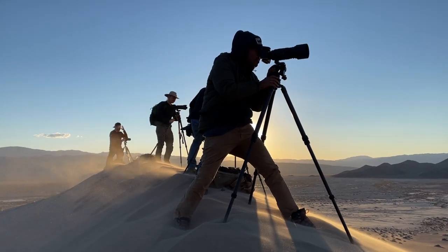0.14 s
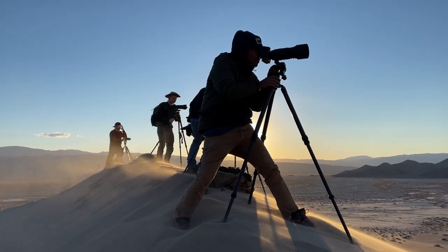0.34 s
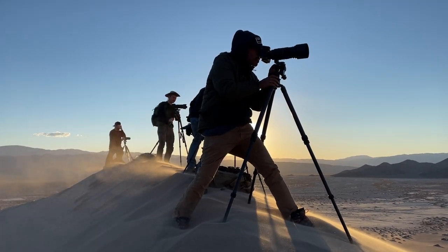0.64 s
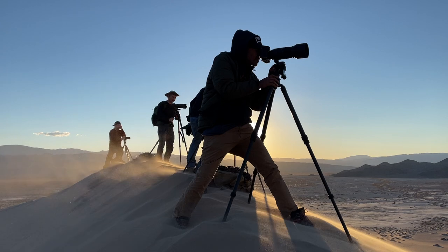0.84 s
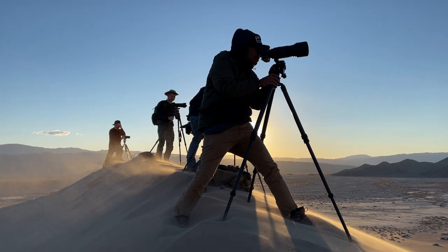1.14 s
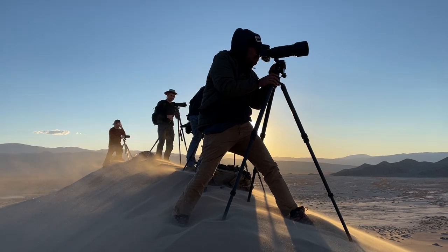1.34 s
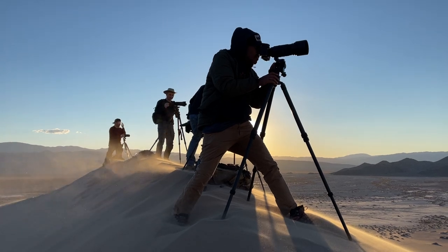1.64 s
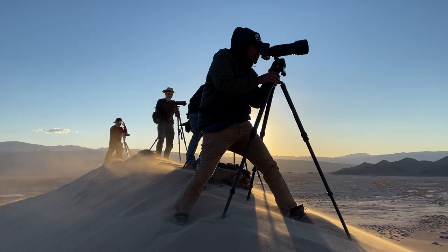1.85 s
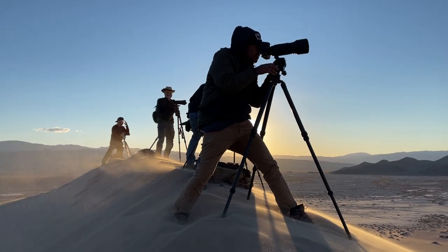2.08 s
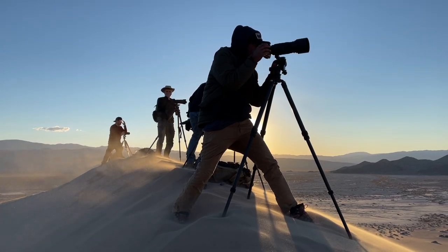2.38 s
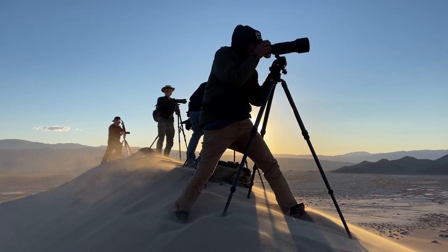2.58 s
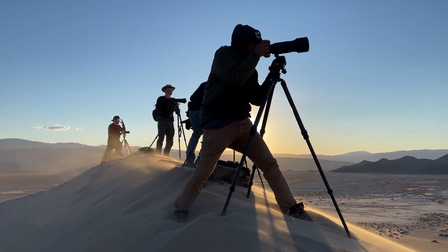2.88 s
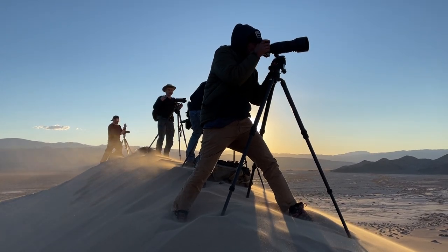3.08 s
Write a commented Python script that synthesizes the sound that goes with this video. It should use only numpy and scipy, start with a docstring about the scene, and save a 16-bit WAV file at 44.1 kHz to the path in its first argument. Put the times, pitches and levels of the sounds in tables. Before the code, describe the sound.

Strong wind buffets an exposed handheld stereo microphone on an open dune for about 3.2 seconds. Deep rumble and lumpy, fluttering roar run throughout, swelling irregularly. Short thuds of falling pitch slap the ports, clustering strongly around 2.1-2.5 s. Sharp, dry, crackly ticks are dense and loud until about 1.8 s, then mostly softer. The roar dips near 3.1 s; faint high hiss lies beneath.

```python
"""A deep rumble under a lumpy roar: strong gusty wind on an open dune, over a handheld stereo microphone's ports.
Rumble, throb, roar and fizz are coloured noise whose levels follow the gusts and the lumps of small eddies.
Larger eddies slap a port with a short thud of falling pitch, a sine mixed with a puff of roar.
Brief snaps of turbulence at the ports tick on top as ragged noise bursts.
Faint high-treble microphone hiss lies beneath it all."""
import sys
import numpy as np
from scipy import signal
from scipy.fft import rfft, irfft, next_fast_len
from scipy.io import wavfile
from scipy.ndimage import map_coordinates

SR = 44100
rng = np.random.default_rng(int(sys.argv[2]) if len(sys.argv) > 2 else 0)


def put_to_file(sound):
    """Save the sound as 16-bit audio at rate SR, in the file named by the first command-line argument."""
    columns = np.atleast_2d(sound).T  # one column per channel
    safe = np.clip(columns, -1, 1)
    whole_steps = np.round(safe * 32767)
    wavfile.write(sys.argv[1], SR, whole_steps.astype(np.int16))


N = 142002
HALVES = np.array([[.5], [-.5]])  # splits a left-over-right difference between the ports


def amp(db):
    """dB to gain."""
    return 10 ** (np.asarray(db) / 20)


def unit(x):
    """Scaled to rms 1."""
    return x / np.sqrt(np.mean(x ** 2) + 1e-20)


def along(points, hz):
    """Interpolates (frequency_hz, value) points on a log-frequency axis."""
    point_hz, values = np.transpose(points)
    return np.interp(np.log(hz + 1), np.log(point_hz + 1), values)


def curves(rows):
    """One value per sample for each column after the time."""
    time_s, *columns = np.transpose(rows)
    return [np.interp(np.arange(N) / SR, time_s, column) for column in columns]


def wobble(knots_per_s):
    """Smooth random curve with its extremes rounded off."""
    knots = rng.standard_normal(4000)
    curve = map_coordinates(knots, [np.arange(N) * knots_per_s / SR])
    return 2.69 * np.tanh(curve / 2.66)


def port_wobble(scale_db, knots_per_s):
    """Level wobble in dB: one part shared by the ports, a larger part separate in each."""
    separate = np.array([wobble(knots_per_s), wobble(knots_per_s)])
    return scale_db * (wobble(knots_per_s) + 2.01 * separate)


def filtered(x, response):
    """x times a complex response of frequency in Hz."""
    size = next_fast_len(N + SR // 2)
    return irfft(rfft(x, size) * response(np.fft.rfftfreq(size, 1 / SR)), size)[..., :N]


def add(out, start_s, level_db, pan_db, sound):
    """Adds a sound at its start, with pan_db of left over right split between the ports."""
    i = max(round(start_s * SR), 0)
    n = min(sound.shape[-1], N - i)
    out[:, i:i + n] += (amp(level_db + HALVES * pan_db) * sound)[:, :n]


# hiss colour in the sum and difference of the ports: frequency_hz, relative_db
HISS_SUM = [(4000, -36), (6000, -7), (8000, -3), (9500, 0.5), (10200, -32), (10700, 1), (11300, 2.5),
            (12000, -1), (14000, -11.5)]
HISS_DIFFERENCE = [(4000, -26), (6000, -16), (8000, -5), (9000, -5), (9800, -1), (10500, 11), (11200, -1),
                   (11800, -28), (12600, -32), (14000, -50)]
# phase of the difference against the sum: frequency_hz, phase_rad
HISS_PHASE = [(9000, 1.5), (10500, 1.6), (11500, 2.5), (12200, 3)]
HISS_SUM_DB = -68  # rms of the sum part, before the treble roll-off


def hiss():
    """Microphone hiss: one noise reaches sum and difference of the ports with its own colour and phase."""
    def response(hz):
        to_sum = amp(along(HISS_SUM, hz)) + 0j
        to_difference = amp(along(HISS_DIFFERENCE, hz)) * np.exp(1j * along(HISS_PHASE, hz))
        return np.array([to_sum, to_difference])

    mid, side = filtered(rng.standard_normal(N), response)
    return amp(HISS_SUM_DB) * np.array([mid + side, mid - side]) / np.std(mid)


FLURRY_DB, FLURRY_WIDTH_S, FLURRY_LAG_S = 3, 0.0037, 0.0044  # lift is scaled again in each layer


def flurries():
    """The air roughens around each loud tick: a smooth, saturating lift in dB."""
    marks = np.bincount([round((start_s + FLURRY_LAG_S) * SR) for start_s, *_ in TICKS], minlength=N)[:N]
    t = np.arange(-SR // 30, SR // 30 + 1) / SR
    bell = np.exp(-.5 * (t / FLURRY_WIDTH_S) ** 2)
    return FLURRY_DB * np.tanh(signal.fftconvolve(marks, bell, "same"))


# loudest ticks, centred 1 ms after start_s:
# start_s, peak_db, left_over_right_db, slope_db_per_octave, decay_ms (floor 0.1)
TICKS = [(0.0915, -11.5, -4, -27, 0.52), (0.1132, -14.5, 17, -21, 0.72), (0.1294, -15, 1, -12.5, 0.57),
         (0.2288, -18.5, 20, -21, 0.95), (0.2483, -16, -2, -18, 1.2), (0.278, -21, -10, -22, 2.2),
         (0.3105, -15.5, -5, -19.5, 1.8), (0.4225, -20, -1, -21, 1), (0.4664, -26, 15, -30, 0.58),
         (0.4849, -10, 4, -15.5, 0.3), (0.5036, -19.5, 21, -16, 0.66), (0.528, -16, 10, -20, 0.78),
         (0.585, -12.5, 7, -22, 0.68), (0.604, -17, 15, -14, 1.3), (0.6447, -16, 6, -12.5, 1.02),
         (0.6663, -25, 24, -13.5, 1.2), (0.684, -17, -3, -17, 0.62), (0.7005, -16, 5, -14.5, 0.78),
         (0.7498, -10, 6, -16.5, 0.66), (0.7806, -30, -13, -14, 0.8), (0.8271, -10.5, 2.5, -28, 0.75),
         (0.8873, -9.5, -2, -14, 2.5), (0.954, -19, 5, -14, 1.3), (0.969, -29, 5, -16, 0.36),
         (1.054, -20, 3, -10.5, 0.51), (1.16, -12.5, 11.5, -26, 1.1), (1.1786, -19, 12.5, -12.5, 0.63),
         (1.1934, -15.5, -3, -12.5, 0.76), (1.2133, -18, 10, -16, 1), (1.235, -17, 19, -24, 1.1),
         (1.276, -14, 1, -16.5, 3.4), (1.3243, -11.5, 3, -18.5, 2.1), (1.3538, -14, 4, -16.5, 1.3),
         (1.3906, -20, 4, -13.5, 1.1), (1.394, -13.5, 8, -14, 0.4), (1.447, -11.5, -3, -17.5, 0.34),
         (1.469, -18, 9, -18, 2), (1.483, -16, 7.5, -16, 0.97), (1.517, -26, 25, -15.5, 0.63),
         (1.581, -15.5, -6, -21, 0.74), (1.5925, -15, 13, -23, 0.47), (1.61, -28, 0, -26, 1.1),
         (1.707, -15.5, 0.5, -23, 1.3), (1.7157, -15.5, 3, -20, 1.2), (1.736, -29, -4.5, -12, 0.9),
         (1.7561, -15.5, 7, -14, 1.4), (1.7911, -6.5, 4, -13, 0.063), (1.8268, -26, 15, -24, 1.3),
         (1.8724, -20, 22, -18, 0.91), (1.9023, -16, 5, -27, 1.5), (1.9332, -26, -28.5, -17.5, 0.85),
         (1.9905, -28, 3.0, -13, 1.1), (2.033, -33, 2.0, -12, 1.1), (2.082, -16.5, 4, -25, 1.8),
         (2.144, -25.5, 25.5, -12, 0.67), (2.161, -20, 12, -18, 0.99), (2.219, -22, 15, -19, 0.79),
         (2.2927, -28, -0.5, -15, 0.76), (2.3315, -19, 21, -17.5, 1.4), (2.3499, -21, 22, -17, 0.39),
         (2.395, -18.5, 30, -17, 1.6), (2.4492, -13.5, 14.5, -16.5, 0.79), (2.462, -22, 24, -12, 1.1),
         (2.4744, -20, 27, -12, 1.07), (2.5438, -18, 24.5, -19.5, 1.1), (2.566, -24, -1, -12, 0.97),
         (2.6734, -32, 5.0, -17, 1.1), (2.7357, -22.5, 20, -14, 1.2), (2.7714, -37, 4.5, -19, 1.08),
         (2.792, -23, 3, -26, 0.88), (2.814, -30, 3, -21, 1.1), (2.8458, -21, 10, -23, 1.2),
         (2.885, -39, 0, -28, 1), (2.9188, -21, -3, -22, 0.91), (2.9557, -19, 2, -19, 2.6),
         (2.9766, -40, -10, -16, 1.1), (3.012, -25, -27, -31, 0.86), (3.0235, -16, -2, -21.5, 2.1),
         (3.031, -15.5, -1, -19, 1.1), (3.0862, -22.5, -8, -31, 4.3), (3.1103, -16, 7, -26, 1.8),
         (3.1532, -14.5, 5.5, -21.5, 0.73)]
TICK_TOP_HZ, SPIKE = 8530, 3  # SPIKE: clean centre spike over the ragged noise
SMALL_PER_S, SMALL_SLOPE_DB_PER_OCTAVE, SMALL_DECAY_MS = 280, -22, 0.23
SMALL_DB, SMALL_SPREAD_DB = 8, 6.5  # level offset from the gusts' fizz_db; spread of sizes
SMALL_CAP = .07  # limits the largest small tick
SMALL_CLUMPS = 2.05  # small-tick dB per dB of flurry lift


def small_ticks():
    """Smaller snaps of turbulence at random times, stronger in the flurries; columns as in TICKS."""
    fizz_db = curves(GUSTS)[2] + SMALL_CLUMPS * flurries()
    rows = []
    for when, size, pan in rng.uniform(size=(SMALL_PER_S * N // SR, 3)):
        peak_db = fizz_db[int(when * N)] + SMALL_DB - SMALL_SPREAD_DB * np.log(SMALL_CAP + size)
        pan_db = 4 + 22 * (pan - .5)
        rows.append((when * N / SR, peak_db, pan_db, SMALL_SLOPE_DB_PER_OCTAVE, SMALL_DECAY_MS))
    return rows


def ticks():
    """Brief snaps of turbulence at the ports: ragged noise bursts, each with its own treble slope."""
    out, size = np.zeros((2, N)), 512
    t, hz = np.arange(size) / SR - .003, np.fft.rfftfreq(size, 1 / SR)
    octaves = np.log2(np.maximum(hz, 1500) / 2500)
    band = 1 / (1 + (500 / (hz + 1)) ** 4) / (1 + (hz / TICK_TOP_HZ) ** 30)
    spike = SPIKE * (np.abs(t) < .5 / SR)
    rows = list(TICKS) + small_ticks()
    noises = rng.standard_normal((len(rows), 3, size))
    for (start_s, peak_db, pan_db, slope_db, decay_ms), noise in zip(rows, noises):
        u = 1000 * t / max(decay_ms, .1)
        envelope = np.exp(-np.abs(u) * np.where(u < 0, 1.3, 1))
        burst = (noise[0] + 1.27 * noise[1:] + spike) * envelope  # shared noise plus one per port
        colour = amp(slope_db * octaves) * band
        tick = irfft(rfft(burst) * colour, size) * np.hanning(size) ** .5
        add(out, start_s - .002, peak_db, pan_db, tick / np.abs(tick).max(1, keepdims=True))
    return out


# eddy slaps: start_s, level_db (before SLAP_DB and envelope), left_over_right_db,
# pitch_hz (reference for the fall), length_cycles (of pitch_hz)
SLAPS = [(0.111, -12, -5, 940, 4.3), (0.119, -10, -0.5, 250, 2), (0.162, -3, 1, 280, 1.7),
         (0.1696, 2, 6, 640, 1.48), (0.228, -6, 0.5, 360, 2.2), (0.257, -11, 1, 550, 1.9),
         (0.47, -4.5, 4, 678, 2.14), (0.527, -14.5, -4, 250, 1.7), (0.553, -10.5, 3, 328, 1.9),
         (0.603, -7, -1, 251, 2.05), (0.611, -2.5, 2, 336, 1.34), (0.66, -14, -4, 297, 1.24),
         (0.847, -8, 6, 409, 1.1), (0.874, -5, -1, 376, 1.56), (0.968, -14.5, 7, 460, 1.7),
         (1.01, -5, 11, 653, 3.05), (1.092, -11, 5, 273, 3), (1.162, -5.5, 0, 358, 2.2),
         (1.196, -5, 3, 253, 1.94), (1.234, -4.5, 5, 392, 1.8), (1.322, -9, 10, 680, 2.1),
         (1.375, -7.5, -3, 520, 2.5), (1.418, -10.5, -8, 510, 2.1), (1.5168, -7, -3, 480, 1.66),
         (1.643, -9.5, 7, 600, 1.86), (1.792, -9, 2, 377, 4.7), (1.837, -5, 0, 550, 2.96),
         (1.864, -5.5, 7, 720, 3.6), (1.899, -8.5, 6, 600, 2.2), (2.081, -13, 6, 550, 1.33),
         (2.144, -1, 1, 312, 1.83), (2.161, -3.5, 4, 354, 1.7), (2.219, -3.5, -2, 266, 1.44),
         (2.254, -2, 2, 700, 3.1), (2.315, -7, -2, 1050, 3.6), (2.331, 0, 1.0, 357, 1.4),
         (2.394, 0, 1, 336, 1.93), (2.445, -2.5, -6, 623, 1.16), (2.463, -2, 1.5, 426, 1.93),
         (2.4756, 0, 1, 260, 1.73), (2.542, -11, -1, 368, 2), (2.753, -8.5, 1, 800, 2.3),
         (2.77, -9.5, 1, 323, 2.2), (2.814, -7.5, -9, 564, 1.86), (2.86, -5.5, 1, 263, 2),
         (2.902, -12, 0.5, 477, 1.96), (3.104, -9.5, 1, 530, 1.9), (3.139, -7, 2.0, 404, 1.55)]
SLAP_START, SLAP_END = 2.14, 0.55  # pitch over pitch_hz: at the start, and where the fall tends
SLAP_ROUGH, SLAP_DB = 0.29, 0.5  # puff gain against the sine; level trim


def slaps():
    """A passing eddy: a short swell of sine whose pitch falls, mixed with a puff of roar."""
    out, t = np.zeros((2, N)), np.arange(SR // 30) / SR
    puffs = unit(filtered(rng.standard_normal((3, N)), lambda hz: amp(along(ROAR, hz))))
    puffs = puffs[0] + .5 * puffs[1:]  # shared noise plus one per port
    draws = rng.uniform(size=(len(SLAPS), 2))
    for (start_s, level_db, pan_db, pitch_hz, length_cycles), (flip, place) in zip(SLAPS, draws):
        u = t * pitch_hz / length_cycles
        fall = (SLAP_START - SLAP_END) * .5 * (1 - np.exp(-2 * u))
        cycles = length_cycles * (SLAP_END * u + fall)
        port_phase = np.array([[0], [0.45 * (place - .5)]])
        phase = 2 * np.pi * (cycles + .5 * np.round(flip) + port_phase)  # random polarity
        first = int(place * (N - len(t)))
        puff = puffs[:, first:first + len(t)]
        envelope = 4 * u ** 2 * np.exp(-.6 * u - 2.23 * u ** 2)
        add(out, start_s, level_db + SLAP_DB, pan_db, envelope * (np.sin(phase) + SLAP_ROUGH * puff))
    return out


# similarity of the ports: frequency_hz, likeness (0 unrelated, 1 same)
LIKENESS = [(60, 0.73), (350, 0.76), (500, 0.8), (1000, 0.16), (1500, 0.055), (3000, 0.18)]
# level balance: frequency_hz, left_over_right_db
LEAN = [(100, 0.5), (400, 0.4), (1000, 0.2), (3000, 1)]
# phase between the ports: frequency_hz, left_lead_rad
LEFT_LEAD = [(200, 0.46), (430, -0.87), (1000, -0.48), (1460, -2.17), (2150, 0.35), (3100, -0.29)]


def ports(pair, spectrum):
    """Colours two unrelated signals and mixes them to the ports' likeness, lean and phase, rms 1."""
    def to_sum_and_difference(hz):
        angle = np.arccos(np.clip(along(LIKENESS, hz), -1, 1)) / 2
        return amp(along(spectrum, hz)) * [np.cos(angle), np.sin(angle)]

    def to_ports(hz):
        return amp(HALVES * along(LEAN, hz)) * np.exp(1j * HALVES * along(LEFT_LEAD, hz))

    mid, side = filtered(pair, to_sum_and_difference)
    return unit(filtered(np.array([mid + side, mid - side]), to_ports))


# gust levels before the layer trims: time_s, roar_db, rumble_db, fizz_db
GUSTS = [(0.0, -25.5, -17, -45), (0.09, -26, -24, -43.5), (0.12, -22.5, -20, -40.5), (0.21, -27, -22, -47),
         (0.31, -30.5, -20, -39), (0.42, -28.5, -22, -51.5), (0.52, -24, -21, -40),
         (0.64, -27.5, -20.5, -41.5), (0.69, -27, -20, -44.5), (0.78, -27.5, -20, -38),
         (1.0, -26, -21, -43), (1.13, -27.5, -24.5, -47.5), (1.21, -24, -16.5, -41.5),
         (1.35, -29, -23.5, -39.5), (1.52, -24, -19, -42), (1.56, -27.5, -25, -47), (1.6, -28.5, -13, -50),
         (1.62, -23.5, -28.5, -37), (1.68, -28.5, -22.5, -44), (1.73, -25.5, -22.5, -46),
         (1.8, -34, -15, -52), (1.85, -23.5, -29, -47), (1.89, -28, -18, -42), (2.04, -26, -25, -45),
         (2.09, -25.5, -21, -41), (2.12, -30, -29, -57), (2.15, -24.5, -22, -50.5),
         (2.3, -27.5, -22, -41.5), (2.48, -25.5, -22, -44), (2.58, -28.5, -20.5, -40.5),
         (2.64, -28.5, -18.5, -46.5), (2.69, -24, -25.5, -49.5), (2.74, -27.5, -21.5, -46),
         (2.99, -30, -21.5, -52), (3.08, -35, -21.5, -57), (3.1, -43.5, -25, -45), (3.22, -28, -21.5, -62)]
# layer colours: frequency_hz, relative_db
RUMBLE = [(20, -44), (32, -19), (45, -4.5), (62, 1.5), (90, 0.5), (140, -2), (250, -11.5), (450, -24.5),
          (700, -74)]
THROB = [(100, -63), (170, 0), (280, -2.5), (450, -6), (700, -10), (1100, -39), (2000, -120)]
ROAR = [(200, -73), (400, -2.5), (650, 1), (900, 1.5), (1300, -5), (2000, -18), (3000, -44), (5000, -62),
        (8000, -86), (10000, -120)]
FIZZ = [(1000, -3), (1800, 7.5), (2500, 2.5), (3500, -9), (5000, -21), (7000, -36.5), (9300, -64),
        (10000, -86), (12000, -120)]


def turbulence():
    """Wind noise in four bands: small eddies come in lumps, which swing the fizz hardest."""
    roar_db, rumble_db, fizz_db = curves(GUSTS)
    throb_db = 0.58 * roar_db + 0.35 * rumble_db - 3
    lumps_db = wobble(35) + 2.6 * wobble(80) + 3 * wobble(220)
    rough_db = flurries()

    def layer(swing_db, spectrum):
        return ports(amp(swing_db) * rng.standard_normal((2, N)), spectrum)

    rumble = layer(0.31 * lumps_db, RUMBLE)
    throb = layer(.7 * lumps_db + port_wobble(1.5, 60), THROB)
    roar = layer(0.4 * rough_db + 0.6 * lumps_db + port_wobble(1.5, 90), ROAR)
    fizz = layer(1.6 * rough_db + 1.2 * lumps_db + port_wobble(2.8, 300), FIZZ)
    low = amp(rumble_db + 0.83) * rumble + amp(throb_db) * throb
    return low + amp(roar_db) * roar + amp(fizz_db + 6.5) * fizz


def scene():
    """Wind on the ports with its slaps and ticks."""
    return turbulence() + slaps() + ticks()


LIMIT = 1.05  # amplitude the rounded peaks approach
PORT_HZ, TOP_HZ = 12100, 15700  # steep treble roll-off; band limit


def record(dry):
    """The microphone rounds off the highest peaks, adds hiss, loses top treble and stops at its band limit."""
    held = dry / (1 + np.abs(dry / LIMIT) ** 4) ** .25
    return filtered(held + hiss(), lambda hz: (hz < TOP_HZ) / (1 + (hz / PORT_HZ) ** 40))


dry = scene()
out = record(dry)
put_to_file(out)
```